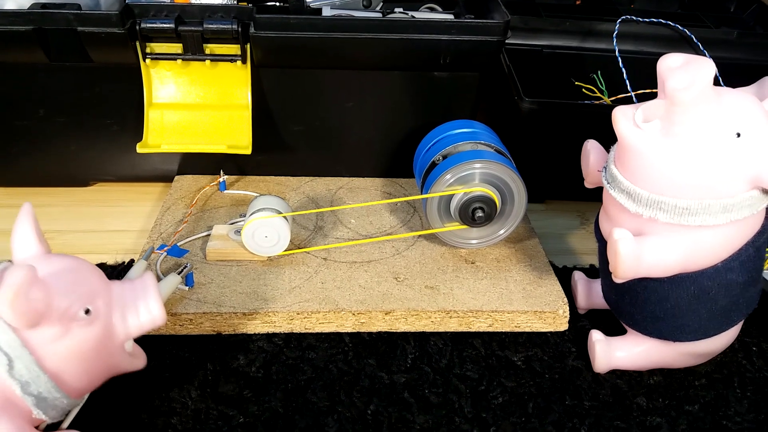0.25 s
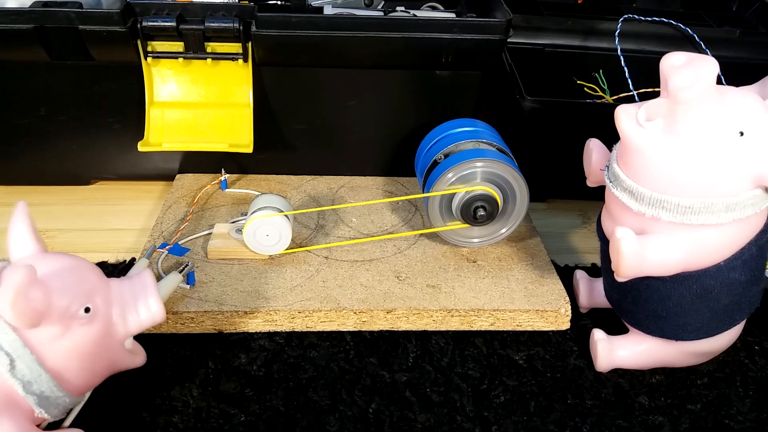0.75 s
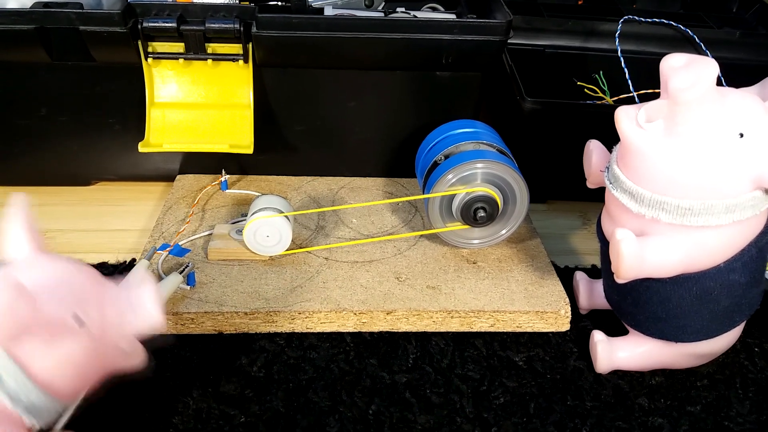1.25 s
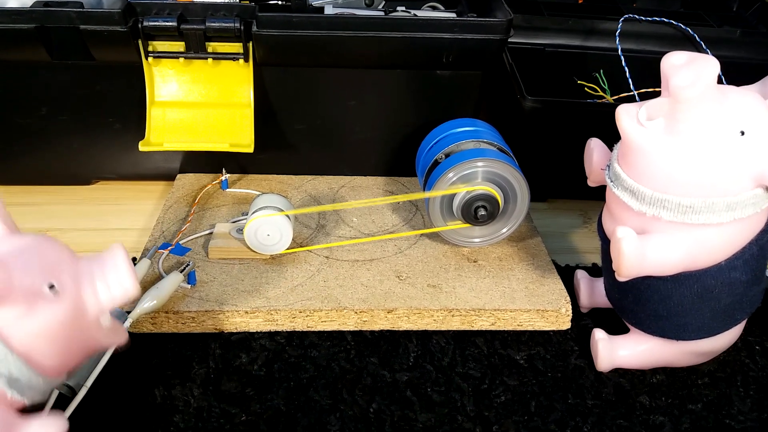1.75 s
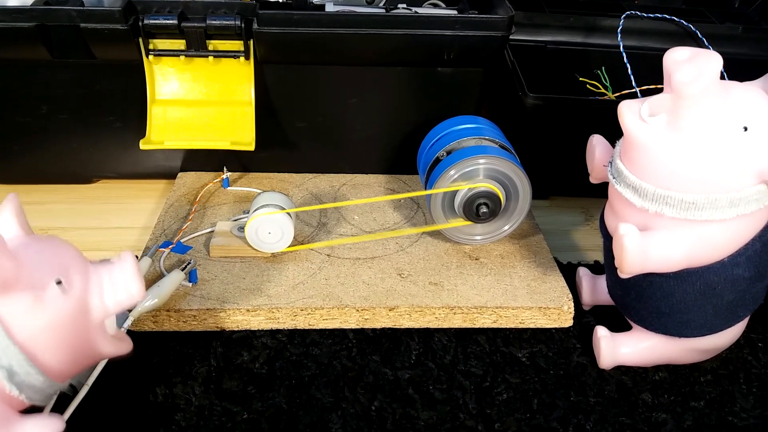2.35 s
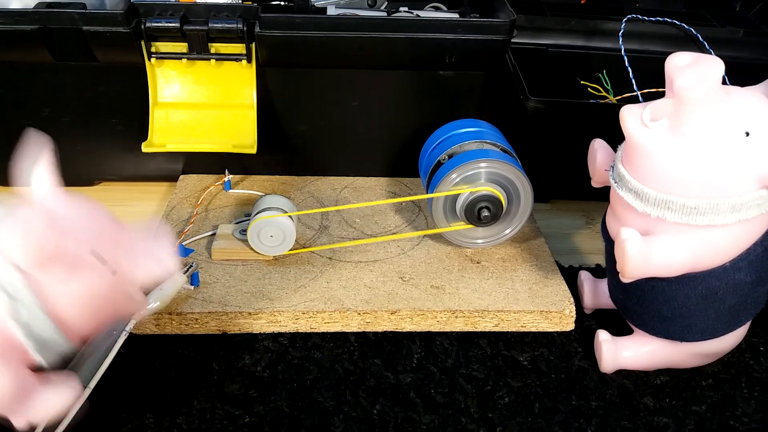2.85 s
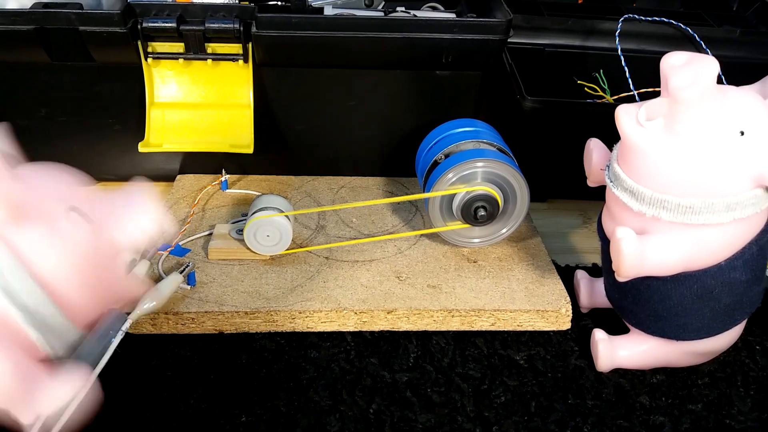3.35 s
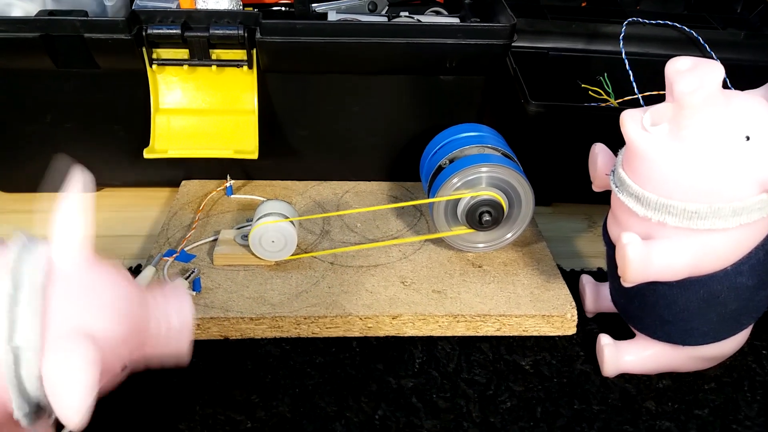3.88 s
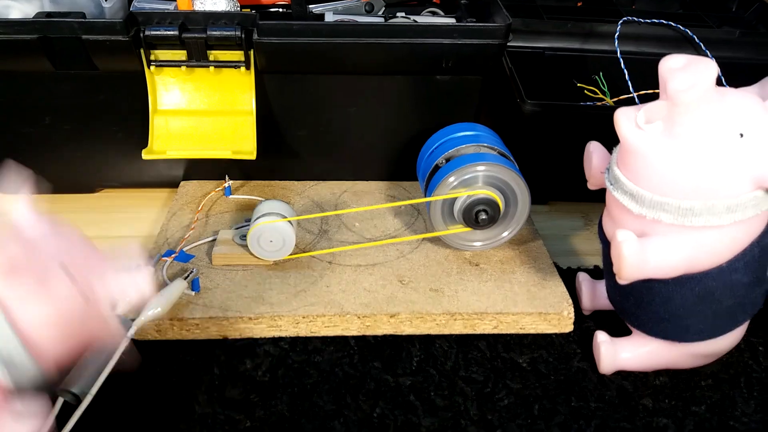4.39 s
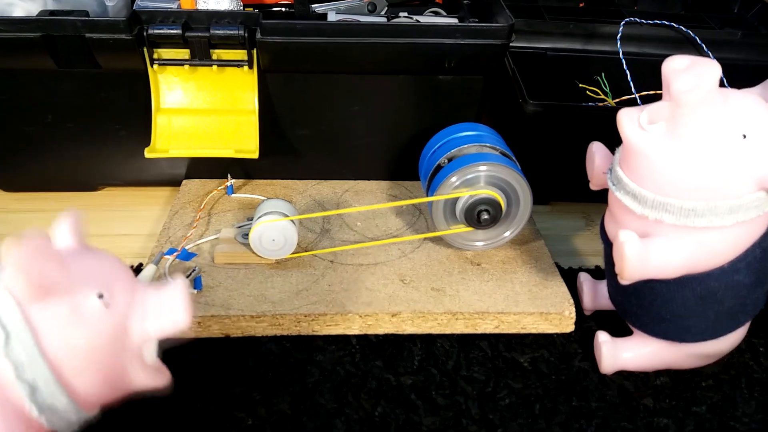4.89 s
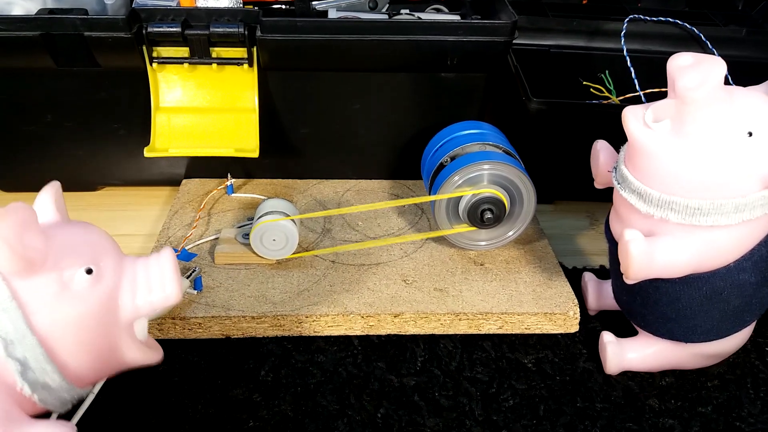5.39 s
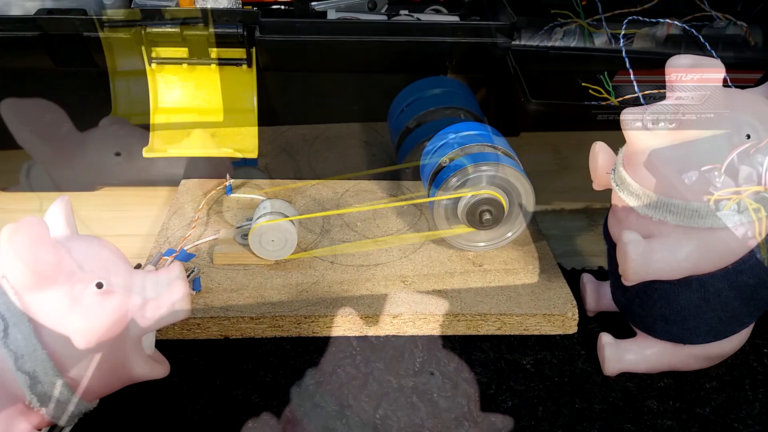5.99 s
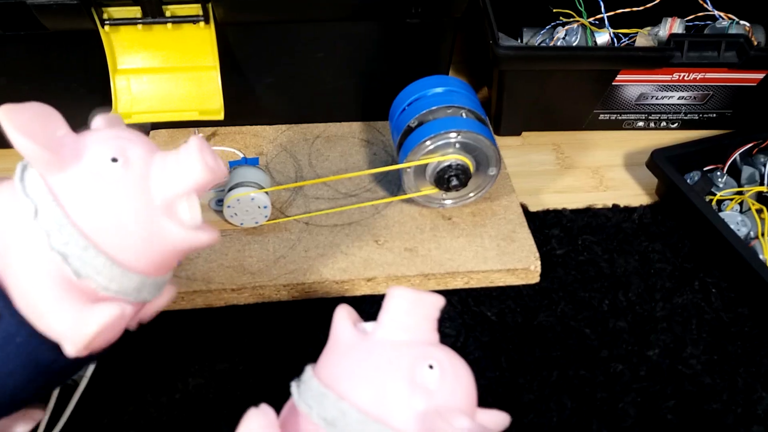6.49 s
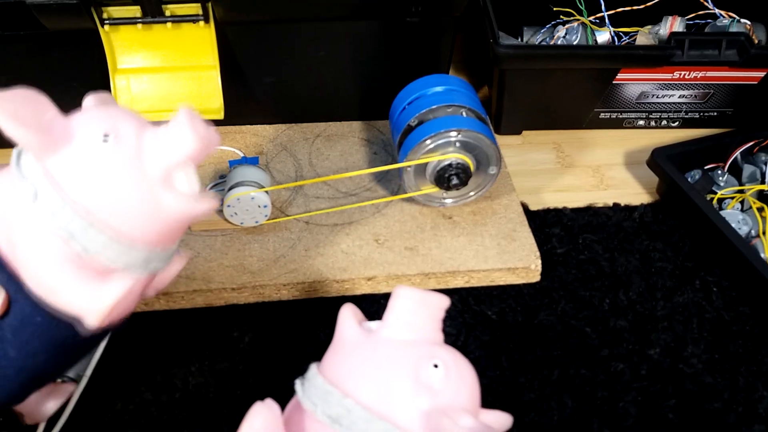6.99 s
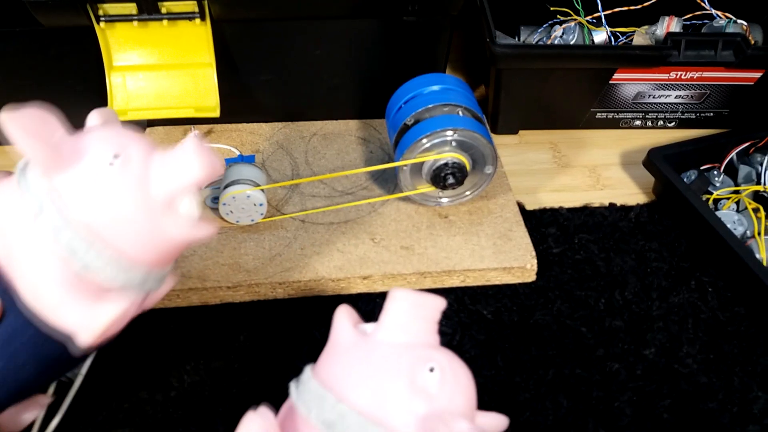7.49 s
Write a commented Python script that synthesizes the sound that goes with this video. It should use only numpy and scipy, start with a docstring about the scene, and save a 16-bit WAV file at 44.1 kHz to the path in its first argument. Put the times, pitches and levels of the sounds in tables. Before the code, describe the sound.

In a small workshop, a little electric motor belted to a flywheel rattles, rasps and whines, very gradually slowing. A hollow rubber pig beside it gives short, low, irregular grunts. Around six seconds the motor stops dead, and the pig grunts on, much closer, longer and harder, with hissing air sucked back between squeezes. Short room echoes, faint steady background noise.

```python
"""A small motor belted to a flywheel on a chipboard base slowly loses speed: its shaft knocks about once a turn,
its brushes rasp, its belt rubs, and two thin whistles glide above. Knocks and noise ring board and can.
Beside it a hollow rubber toy pig is squeezed again and again, so that the flap in its snout grunts.
The motor sound stops abruptly, and the pig grunts on, closer and harder, sucking air back in between squeezes.
Small-room echoes surround both, over a faint steady workshop noise."""
import sys
import numpy as np
from scipy import signal
from scipy.fft import rfft, irfft
from scipy.io import wavfile

SR = 44100
rng = np.random.default_rng(int(sys.argv[2]) if len(sys.argv) > 2 else 0)


def to_wav(sig):
    """Store sig (one row per channel, or 1-D mono) as 16-bit WAV at the path in sys.argv[1].

    Samples outside -1..1 are clipped; the rate is SR.
    """
    pcm = np.clip(np.atleast_2d(sig), -1, 1) * 32767
    pcm = np.round(pcm).astype(np.int16)
    wavfile.write(sys.argv[1], SR, pcm.T)  # frames by channels


N = 341334
TIME = np.arange(N) / SR

MOTOR_STOP_S = 6.05
# the shaft loses the same share of its speed every second
START_TURNS_PER_S, SLOWING_PER_S = 101.9, .0585
# knocks and brushes: gain at the start, and dB lost for every 10 turns per s of lost speed
KNOCK_DB, KNOCK_LOSS_DB = -31.5, 0.4
BRUSH_DB, BRUSH_LOSS_DB = -32, 0.9
# slow wander of the brush pressure and of the knocks' strength
BRUSH_WANDER_DB, KNOCK_WANDER_DB, WANDER_HZ = 1.27, 0.77, 2.54
KNOCK_UNEVEN_DB, KNOCK_JITTER_S = 5, .00025
# belt rub, against the knocks: on the whole board, and more on its low resonances
RUB_DB, LOW_RUB_DB = -10.5, -1.5
WHISTLE_LOSS_DB, WHISTLE_WANDER_DB, WHISTLE_WANDER_HZ = 2, 4, 3.6

# pressure rises for this share of a squeeze; swell and fade are the end depths at a top rate of 100 Hz
RISE_SHARE, SWELL_DB, FADE_DB, PLATEAU_POWER = .45, 15, 10, 1.91
# the flap starts no faster than FLAP_START_HZ; it shuts at a rate that grows a little with the top rate
FLAP_START_HZ, FLAP_END_HZ, FLAP_END_SHARE = 106.4, 44.47, .17
FLAP_UNEVEN_DB, FLAP_JITTER = 2.18, .014
# the mouth closes in the course of a squeeze; the tube's rasp grows with the slap by this power
MOUTH_CLOSING_DB, RASP_POWER = 7.5, 0.88
FAR_DB, CLOSE_DB, BENCH_ECHO_DB = 35.5, 30, -8.5
# air drawn back in: gain on release, fade, and how long the snout takes to open or close
REFILL_DB, REFILL_FADE_DB_PER_S, REFILL_TURN_S = -38, 61, 0.01

ROOM_T60_S, ROOM_TREBLE_T60_S = .28, .18
RIG_ROOM_BASS_DB, RIG_ROOM_TREBLE_DB = -5, -12
TOY_ROOM_BASS_DB, TOY_ROOM_TREBLE_DB = -9.5, -9.5
CUTOFF_HZ = 15900

# squeezes of the pig: start_s [s], length_s [s], top_flap_rate_hz [Hz],
# level_db [dB, relative], mouth_opening_db [dB, mid-squeeze]
SQUEEZES = [ (0.004, 0.06, 67.8, -17, 5), (0.19, 0.067, 74.4, -18, 6), (0.393, 0.039, 80, -22, -7),
            (0.67, 0.062, 66.1, -19.5, 5), (0.857, 0.03, 74.8, -12, 1), (1.175, 0.085, 74.5, -9, -5),
            (1.465, 0.087, 69.8, -11, -6), (1.746, 0.088, 72.45, -11, 0), (2.022, 0.079, 74.1, -11, -7),
            (2.298, 0.076, 87.2, -8.5, -8), (2.538, 0.062, 67.8, -14, -8), (2.962, 0.1, 69.26, -7.5, 0),
            (3.386, 0.089, 80.6, -10, -1), (3.675, 0.049, 63.2, -12.5, 0), (3.939, 0.1, 106.7, -6.5, 0),
            (4.192, 0.065, 102.9, -8.5, -13), (4.54, 0.067, 60.2, -19, 10), (4.735, 0.032, 62, -13.5, -3),
            (5.084, .12, 227, -2, 6.5), (6.207, 0.11, 121.3, -2.5, 1.5), (6.46, 0.17, 239.1, 0.5, 3.5),
            (6.799, 0.12, 202.7, 0, 2.5), (7.053, 0.098, 108.5, -2, 3), (7.269, .16, 218.1, 1.5, 0.5),
            (7.488, 0.15, 170, 1, 3), (7.642, 0.14, 219, 1.5, -1.5)]


def from_db(db):
    """Decibels to gain."""
    return 10 ** (np.asarray(db) / 20)


def rms_one(x):
    """Scale to unit power."""
    return x / np.sqrt(np.mean(x ** 2) + 1e-20)


def cut(x, hz, kind, order=2):
    """Butterworth low-pass or high-pass."""
    sos = signal.butter(order, min(hz, .45 * SR), kind, fs=SR, output="sos")
    return signal.sosfilt(sos, x + 1e-18)


def drift(rate_hz):
    """Random curve of spread 1 that wanders no faster than about the given rate."""
    settled = cut(rng.standard_normal(N + SR), rate_hz, "low")[SR:]
    return rms_one(settled)


def resonate(x, modes):
    """Parallel resonances, each with its given gain on top."""
    out = 0
    for hz, width, db in modes:
        r = np.exp(-np.pi * width / SR)
        poles = [1, -2 * r * np.cos(2 * np.pi * hz / SR), r * r]
        ringing = signal.lfilter([1, 0, -1], poles, x + 1e-18)
        out = out + from_db(db) * (1 - r * r) / 2 * ringing
    return out


def resonate_twice(x, modes):
    """Resonances passed twice: slower to swell, with dark valleys between them."""
    return sum(resonate(resonate(x, [(hz, width, db)]), [(hz, width, 0)]) for hz, width, db in modes)


def reflections(x, t60, gap_s):
    """Dense echoes of unit energy that begin after a gap and die away."""
    t = TIME[:SR // 2]
    tail = rng.standard_normal(len(t)) * from_db(-60 * t / t60) * (t > gap_s)
    return signal.fftconvolve(x, tail / np.linalg.norm(tail))[:N]


def motor():
    """Knocks and belt rub shake the board; knocks and the rasp of the brushes ring the can; speed sets the levels."""
    # resonances of the board and motor mount: pitch_hz [Hz], width_hz [Hz], level_db [dB]
    board_modes = [(202, 117, -4.5), (462, 60, -11.5), (546, 76, -6), (827, 194, -8.5), (1120, 48, 0),
                   (1358, 145, -10), (1542, 124, -4.5), (1938, 85, 8.5), (2620, 350, -33), (3002, 138, 2)]
    # resonances of the motor's metal can: pitch_hz [Hz], width_hz [Hz], level_db [dB]
    can_modes = [(4340, 159, 6.5), (4832, 124, 2.5), (5810, 930, -24), (6300, 190, -37), (7840, 110, -19.5),
                 (7654, 180, -17.5), (8700, 350, -22), (10313, 340, -18)]
    speed = START_TURNS_PER_S * np.exp(-SLOWING_PER_S * TIME)
    slowed = (START_TURNS_PER_S - speed) / 10
    knock_db = KNOCK_DB - KNOCK_LOSS_DB * slowed + KNOCK_WANDER_DB * drift(WANDER_HZ)
    brush_db = BRUSH_DB - BRUSH_LOSS_DB * slowed + BRUSH_WANDER_DB * drift(WANDER_HZ)
    turns = np.cumsum(speed) / SR
    hits = knocks(turns)

    rub = rng.standard_normal(N)
    board = resonate(cut(hits, 730, "high", order=1) + from_db(RUB_DB) * rub, board_modes)
    board = board + from_db(LOW_RUB_DB) * resonate(rub, board_modes[:7])
    board = cut(cut(board, 3550, "low", order=6), 74, "high")
    board = from_db(knock_db) * rms_one(board)

    # the rasp flutters at random and pulses once a turn
    flutter_db = 2.96 * drift(96) + 0.59 * np.cos(2 * np.pi * turns)
    chatter = rms_one(rng.standard_normal(N) * from_db(flutter_db))
    # the faster the shaft, the more the brushes chatter
    chatter = (speed / 85) ** 2 * chatter
    can = resonate_twice(chatter + from_db(-4) * cut(hits, 5200, "low", order=4), can_modes)
    end_cap = resonate_twice(chatter + hits, [(4520, 4800, 0)])  # damped, hence broad
    can = rms_one(can) + from_db(-7) * rms_one(end_cap)
    upper_can = rms_one(resonate_twice(chatter, can_modes[2:]))
    can = cut(can, 5060, "low", order=10) + upper_can * from_db(-19)
    return board + from_db(brush_db) * rms_one(can) + whistles(slowed)


def knocks(turns):
    """The loose shaft hits its bearing once a turn, never twice alike, with a few extra knocks, mostly harder."""
    # extra knocks: time_s [s], level_db [dB, against the nominal knock]
    jolts = [(0.622, 2), (1.98, 2.5), (2.412, 5), (2.812, -6), (4.431, 7.5), (4.906, 3.5), (5.049, 2),
             (5.585, 5), (5.859, 4), (5.929, 2)]
    at = np.flatnonzero(np.diff(np.floor(turns)))
    chance = np.clip(rng.standard_normal((len(at), 2)), -2, 1)
    late = (chance[:, 0] * KNOCK_JITTER_S * SR).astype(int)
    clicks = np.zeros(N)
    clicks[np.clip(at + late, 0, N - 1)] = from_db(KNOCK_UNEVEN_DB * chance[:, 1])
    for time_s, db in jolts:
        clicks[int(time_s * SR)] = from_db(db)
    return rms_one(clicks)


def whistles(slowed):
    """Thin tones that glide slowly, come and go, and weaken as the shaft slows."""
    # motor whistles: start_pitch_hz [Hz], glide_hz_per_s [Hz/s], start_level_db [dB]
    tones = [(5464, -7, -49.5), (5060, 9.5, -55)]
    out = 0
    for hz, glide, db in tones:
        wander = np.minimum(drift(WHISTLE_WANDER_HZ), 1)
        level_db = db - WHISTLE_LOSS_DB * slowed + WHISTLE_WANDER_DB * wander
        pitch_hz = hz + glide * TIME + 4 * drift(31)
        tone = np.sin(2 * np.pi * np.cumsum(pitch_hz) / SR)
        out = out + from_db(level_db) * np.sqrt(2) * tone
    return out


def pig():
    """The toy grunts first from behind the rig, then close by; the bench throws back quick echoes."""
    slaps = flaps()
    close = TIME > MOTOR_STOP_S
    far_voice = from_db(FAR_DB) * grunts(slaps * ~close, column=2)
    close_voice = from_db(CLOSE_DB) * grunts(slaps * close, column=3)
    voice = far_voice + close_voice
    # the snout holds the upper partials back for a moment, and swallows one band
    for hz, width in ((1300, 700), (2700, 700), (5600, 900)):
        voice = voice - 2 * resonate(voice, [(hz, width, 0)])
    voice = voice - resonate(voice, [(3850, 800, 0)])
    echoes = reflections(cut(voice, 640, "high"), t60=0.039, gap_s=0.00092)
    return voice + from_db(BENCH_ECHO_DB) * echoes


def flaps():
    """Air pressure rises and falls in an arch in each squeeze; the flap slaps faster and harder with it."""
    slaps = np.zeros(N)
    for start, length, top_rate, db, _ in SQUEEZES:
        t, hardest = start, start + RISE_SHARE * length
        # each side of the arch: span in s, flap rate at its edge in Hz, depth in dB
        rising = hardest - start, min(top_rate, FLAP_START_HZ), SWELL_DB
        falling = start + length - hardest, FLAP_END_HZ + FLAP_END_SHARE * top_rate, FADE_DB
        for late, strong in rng.standard_normal((48, 2)):
            if t > start + length or t * SR >= N:
                break
            span, edge_rate, depth_db = rising if t < hardest else falling
            slack = ((t - hardest) / span) ** 2
            # a squeeze with a faster top rate has farther to rise and fall
            sag_db = depth_db * np.sqrt(top_rate / 100) * slack ** PLATEAU_POWER
            slaps[max(int(t * SR), 0)] = from_db(db - sag_db + FLAP_UNEVEN_DB * strong)
            rate = top_rate + slack * (edge_rate - top_rate)
            t += (1 + FLAP_JITTER * late * FLAP_START_HZ / rate) / rate  # faster flapping is steadier
    return slaps


def grunts(slaps, column):
    """Each slap rings the hollow rubber body; the harder it is, the more it stirs the flap's top resonances."""
    # resonances of belly, mouth, snout tube and flap:
    # pitch_hz [Hz], width_hz [Hz], far_level_db [dB], close_level_db [dB]
    parts = [(159, 66, -8, -5.5), (199.5, 89, -6, -4.5), (284, 38, -10, -15.5), (473, 136, -11, -19),
             (1124, 410, -24, -17), (1690, 430, -16.5, -18.5)], [(770, 163, -22, -11.5), (923, 80, -45, -11.5)], [(2577, 530, -22, -23.5), (2937, 420, -15.5, -13.5),
                                           (4644, 470, -19.5, -15.5), (5200, 190, -25, -21)], [(5937, 470, -25, -25.5), (6310, 970, -33.5, -26.5),
                                                         (7620, 630, -33, -33), (9800, 9700, -60, -56)]
    belly, mouth, tube, flap = [np.array(modes)[:, [0, 1, column]] for modes in parts]

    mouth_times, mouth_db = [], []
    for start, length, *_, opening in SQUEEZES:
        mouth_times += [start, start + length]
        mouth_db += [opening + MOUTH_CLOSING_DB / 2, opening - MOUTH_CLOSING_DB / 2]
    opening_db = np.interp(TIME, mouth_times, mouth_db)

    # every slap lets out a short puff of turbulent air
    puff_decay = np.exp(-1 / (.0025 * SR))
    puffs = signal.lfilter([1], [1, -puff_decay], slaps ** 1.4) * rng.standard_normal(N)
    drive = slaps + from_db(-21.5) * cut(puffs, 335, "high")
    body = resonate(drive, belly) + resonate(drive * from_db(opening_db), mouth)
    body = cut(cut(body, 1796, "low", order=4), 71, "high")
    rasp = resonate_twice(slaps ** RASP_POWER + from_db(-20) * puffs, tube)
    sizzle = resonate_twice(slaps ** 2.4 + from_db(-18) * puffs, flap)
    return body + rasp + sizzle


def refill():
    """Close by, the rubber springs back: air rushes in on each release and dwindles until the next squeeze."""
    # hiss of the inward air: pitch_hz [Hz], width_hz [Hz], level_db [dB]
    snout = [(1051, 190, 1), (1200, 190, 12), (1550, 190, -28), (3030, 350, -26), (4370, 550, -12)]
    close = [(start, start + length) for start, length, *_ in SQUEEZES if start > MOTOR_STOP_S]
    # the first inrush opens just before the motor stops
    releases = [MOTOR_STOP_S - REFILL_TURN_S] + [end for _, end in close]
    flow = np.zeros(N)
    for release, (next_start, _) in zip(releases, close):
        since_opening = TIME - release + REFILL_TURN_S
        opened = np.clip(np.minimum(since_opening, next_start - TIME) / REFILL_TURN_S, 0, 1)
        flow += opened * from_db(REFILL_DB - REFILL_FADE_DB_PER_S * np.maximum(TIME - release, 0))
    air = rms_one(cut(resonate(rng.standard_normal(N), snout), 5600, "low"))
    return flow * from_db(0.94 * drift(23)) * air


def room(x, bass_db, treble_db):
    """A small room whose bass rings longer than its treble."""
    bass = reflections(cut(x, 660, "low"), ROOM_T60_S, gap_s=0.004)
    treble = reflections(cut(x, 287, "high"), ROOM_TREBLE_T60_S, gap_s=0.0032)
    return x + from_db(bass_db) * bass + from_db(treble_db) * treble


def room_tone():
    """Faint steady noise of the workshop, shaped by a smooth spectrum."""
    # noise spectrum: pitch_hz [Hz], density_db [dB per Hz, relative]
    spectrum = [(20, -37), (45, 2), (80, 10.5), (200, 1), (500, 1), (2000, -30), (6000, -46),
                (15000, -25.5)]
    hz, db = np.transpose(spectrum)
    bins_hz = np.fft.rfftfreq(N, 1 / SR)
    gain = from_db(np.interp(np.log(bins_hz + 1), np.log(hz), db))
    noise = irfft(rfft(rng.standard_normal(N)) * gain, N)
    return from_db(-52.0) * rms_one(noise)


def scene():
    """Rig and toy on a workbench; the sound of the rig stops dead, its echoes too."""
    rig = room(motor(), RIG_ROOM_BASS_DB, RIG_ROOM_TREBLE_DB) * (TIME < MOTOR_STOP_S)
    toy = room(pig(), TOY_ROOM_BASS_DB, TOY_ROOM_TREBLE_DB)
    return (rig + toy + refill() + room_tone())[None]


def record(dry):
    """The loudest peaks are rounded; rumble and the very top are cut."""
    rounded = cut(np.tanh(dry), 45, "high")
    return signal.sosfilt(signal.ellip(10, .1, 80, CUTOFF_HZ, fs=SR, output="sos"), rounded)


dry = scene()
out = record(dry)
to_wav(out)
```